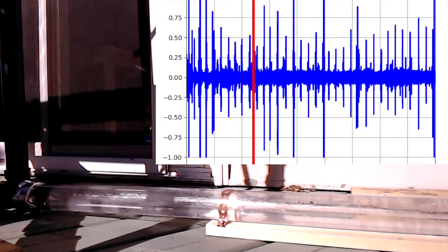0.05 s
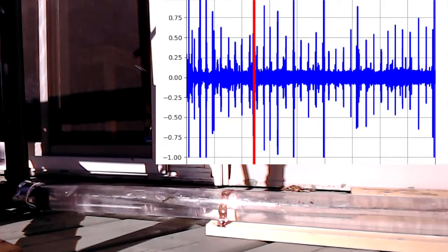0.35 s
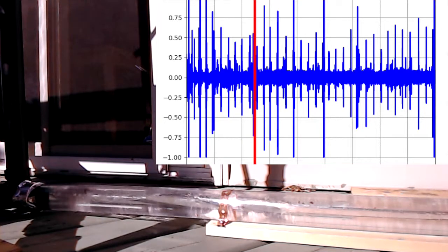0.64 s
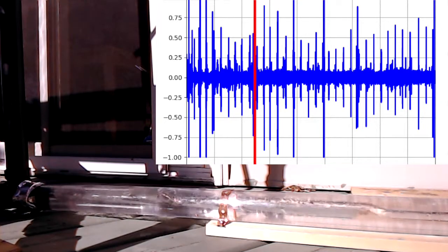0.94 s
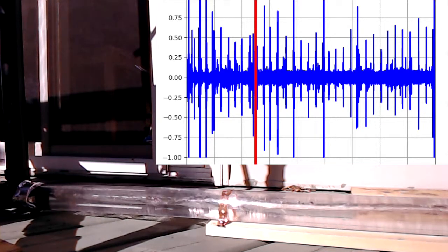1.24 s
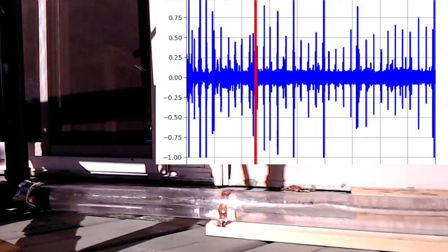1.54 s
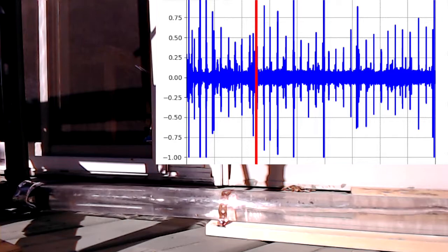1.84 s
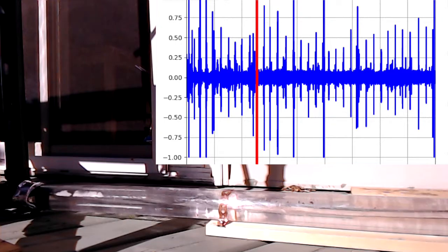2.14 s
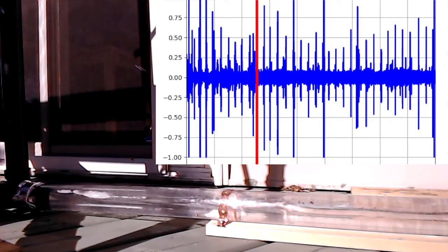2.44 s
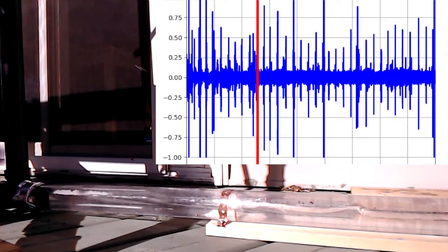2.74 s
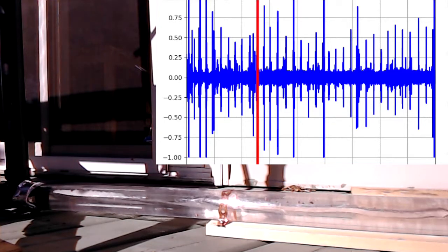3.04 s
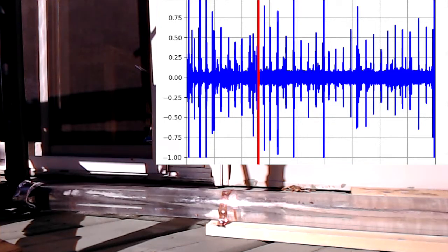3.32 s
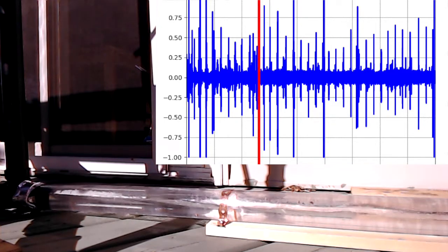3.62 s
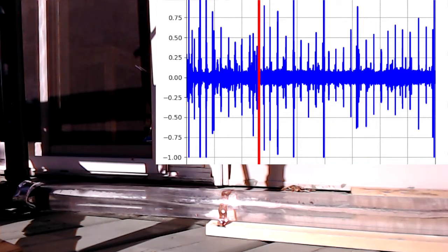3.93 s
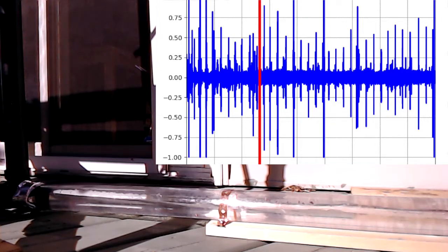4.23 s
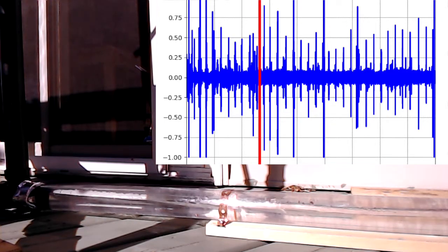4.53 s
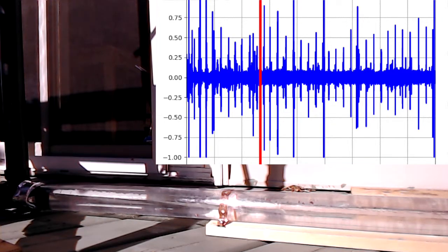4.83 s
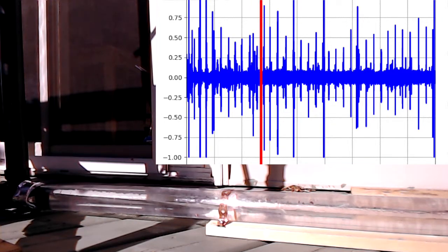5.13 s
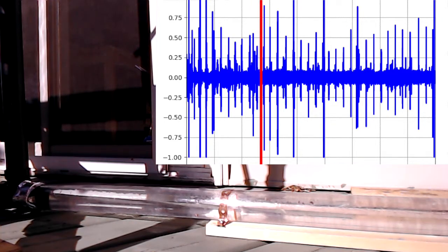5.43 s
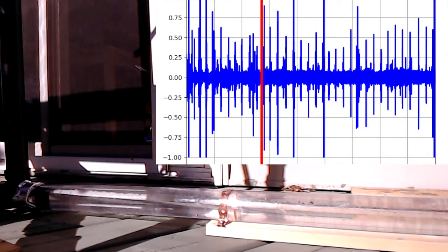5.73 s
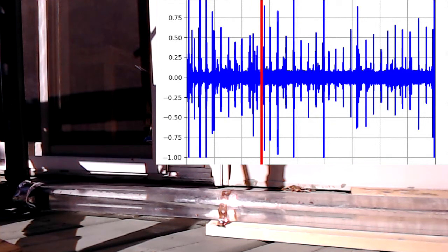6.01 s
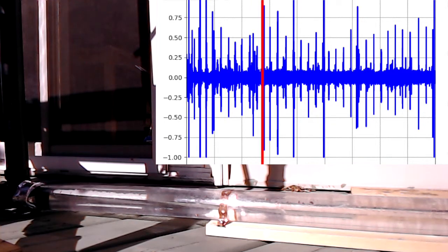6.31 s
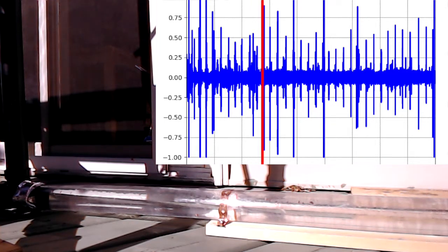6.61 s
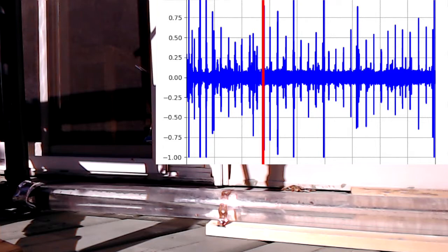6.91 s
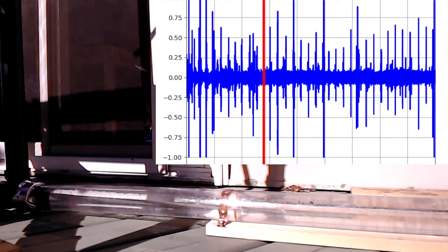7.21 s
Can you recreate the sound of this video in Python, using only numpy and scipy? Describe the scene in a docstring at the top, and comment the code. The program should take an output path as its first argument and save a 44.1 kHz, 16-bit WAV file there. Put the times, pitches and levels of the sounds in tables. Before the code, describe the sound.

Steam flows into cold water inside a plastic pipe, hissing and fizzing steadily over a low churning rumble. About two seconds in, a dull thump is followed by a sharp knock that briefly rings the pipe. Small spurts, ticks and a faint rising whistle follow. Near the end the thump and knock come again, harder, overloading the close stereo microphone.

```python
"""Water hammer in a plastic pipe, twice: a steam pocket collapses with a dull thump, and about 0.4 s
later a sharp knock rings the pipe. The steam flowing into the cold water hisses steadily, with fizz,
spurts, ticks and a faint whistle, over the low rumble of churning water.
A small narrow-band stereo microphone stands close by and overloads on the last knock."""
import sys
import numpy as np
from scipy import signal
from scipy.fft import rfft, irfft
from scipy.io import wavfile

SR = 44100
rng = np.random.default_rng(int(sys.argv[2]) if len(sys.argv) > 2 else 0)


def waveform_to_disk(signal):
    """Save audio, clipped to [-1, 1], as 16-bit WAV at the path in sys.argv[1]."""
    frames = np.transpose(np.atleast_2d(signal))
    scaled = np.clip(frames, -1, 1) * 32767
    samples = np.round(scaled).astype(np.int16)
    wavfile.write(sys.argv[1], SR, samples)


N = 328986


# cushioned steam pockets: start_s, strength_db, bounce_hz
SOFT_POCKETS = [(1.389, -22, 760), (1.7815, -1, 204), (3.967, -23.5, 525), (5.076, -21, 450),
                (5.299, -20, 666), (6.9603, 2, 240)]
# hammer slams: start_s, strength_db, bounce_hz, top_hz, first_rebound_db, heave_db
SLAMS = [(2.2057, -1.24, 710, 3070, -8, -1.5), (7.3462, -0.5, 850, 2120, 7, 4.5)]

def collapse_pressure():
    """A soft pocket thuds and rebounds faintly; a slam heaves the water back and rebounds twice."""
    pressure = np.zeros(N)
    for start_s, strength_db, bounce_hz in SOFT_POCKETS:
        thud = from_db(strength_db) * collapse(bounce_hz, quality=0.66, top_hz=2.35 * bounce_hz)
        add(pressure, thud, start_s)
        add(pressure, from_db(-15.5) * thud, start_s + 0.036)
    for start_s, strength_db, bounce_hz, top_hz, first_rebound_db, heave_db in SLAMS:
        slam = from_db(strength_db) * collapse(bounce_hz, quality=5.7, top_hz=top_hz)
        heave = from_db(heave_db) * collapse(bounce_hz=63, quality=1.65, top_hz=92)
        add(pressure, slam, start_s)
        add(pressure, heave, start_s + 0.0048)
        add(pressure, rebound(first_rebound_db), start_s + 0.006966)
        add(pressure, rebound(strength_db=-5), start_s + 0.025)
    return pressure


def collapse(bounce_hz, quality, top_hz):
    """A pocket caves in and bounces; steam left inside cushions the pulse and dulls it."""
    w = 2 * np.pi * bounce_hz
    kick = cut(signal.unit_impulse(SR // 8), bounce_hz, "high", order=1)
    resonator = signal.bilinear([-1, 0, 0], [1, w / quality, w * w], SR)
    bounce = signal.lfilter(*resonator, kick)
    return cut(bounce, top_hz, "low", order=3)


def rebound(strength_db, db_per_octave=8):
    """The pocket reopens and caves in again: a low pulse, brighter the harder it is."""
    top_hz = 710 * 2 ** (strength_db / db_per_octave)
    return from_db(strength_db) * collapse(bounce_hz=278, quality=1.1, top_hz=top_hz)


# modes of the clamped, water-filled pipe: pitch_hz, gain_db, t60_s
PIPE_MODES = [(179, -32, 0.62), (254.3, -18.5, 0.14), (334, -28.5, 0.42), (374, -17.5, 0.07),
              (389.2, -14.5, 0.072), (446.8, -18, 0.13), (505, -21, 0.13), (536.5, -18.5, 0.088),
              (650, -20, 0.086), (694, -19.5, 0.085), (792, -22, 0.083), (902.6, -24.5, 0.12),
              (950.3, -18.5, 0.11), (996, -31, 0.14), (1454, -27.5, 0.052), (1900, -32, .04),
              (2050, -33.5, 0.042)]
# reflections: delay_s, left_db, right_db
REFLECTIONS = [(0.0053, -12, -31), (0.0132, -19.5, -10.5), (0.0193, -17.5, -14), (0.0278, -14, -21)]

def pipe(pressure):
    """Pressure pulses ring the pipe's modes; the pulse bounces along the pipe and repeats the sound."""
    direct = sum(from_db(db) * stereo_gains(hz) * ring(pressure, hz, t60_s)
                 for hz, db, t60_s in PIPE_MODES)
    out = direct.copy()
    for delay_s, left_db, right_db in REFLECTIONS:
        lag = round(delay_s * SR)
        out[:, lag:] += from_db([[left_db], [right_db]]) * direct[:, :-lag]
    return out


# crowded modes of the pipe wall: freq_hz, density_db
CRACK_SPECTRUM = [(500, -33), (1200, -1), (1550, 2), (2100, 2.5), (2650, -11), (3300, 3), (4500, -9.5),
                  (7000, -10)]
# scattered tail of a knock: freq_hz, density_db
TAIL_SPECTRUM = [(60, 1.5), (180, 11), (255, 0), (380, 2), (540, -2.5), (760, -3), (980, -3.5), (1120, -8),
                 (7000, -14.5)]

def water_hammer(knock_db, crack_left_db, crack_right_db, tail_db):
    """Each collapse rings the pipe; sharp ones also draw a bright crack from its wall."""
    pressure = collapse_pressure()
    knocks = from_db(knock_db) * pipe(pressure)
    crack = scatter(pressure, CRACK_SPECTRUM, t60_s=0.051, build_s=0.0005)
    tail = scatter(knocks, TAIL_SPECTRUM, t60_s=0.19, build_s=0.0063)
    return knocks + from_db([[crack_left_db], [crack_right_db]]) * crack + from_db(tail_db) * tail


# steam flow: time_s, flow_db
STEAM_FLOW = [(0.0, -55.5), (0.48, -58), (0.75, -55), (1.24, -58), (2.37, -54), (3.45, -56.5), (3.99, -59),
              (5.17, -55), (5.74, -57), (7.27, -56.5), (7.46, -57)]
# jet hiss: freq_hz, density_db
HISS_SPECTRUM = [(700, -15.5), (1100, -0.5), (1500, 5.5), (2100, 8), (2600, -0.5), (3200, 4.5), (4200, 0.7),
                 (5300, 2.4), (6500, -8.5), (7200, -31)]

def steam_jet(hiss_db, fizz_db, sputter_db):
    """The jet hisses and fizzes, sputtering as it meets the water."""
    flow_db, = in_time(STEAM_FLOW)
    hiss = from_db(hiss_db) * banded_noise(HISS_SPECTRUM, flicker_db=2.1, flicker_hz=11)
    bubbles = from_db(fizz_db) * fizz(per_s=700, t60_cycles=15)
    return from_db(flow_db + sputter_db * drift(rate_hz=120)) * (hiss + bubbles)


def fizz(per_s, t60_cycles):
    """Tiny steam bubbles vanish, each ringing briefly and reaching the two sides unequally."""
    pitches_hz = np.geomspace(1400, 6500, 20)
    snaps = grains(per_s, spread_db=4.0)
    pitch_index = rng.integers(0, len(pitches_hz), N)
    stereo_snaps = snaps * rng.uniform(-1.07, 1, (2, N))
    return rms_one(sum(ring(stereo_snaps * (pitch_index == k), hz, t60_cycles / hz) * np.sqrt(hz)
                       for k, hz in enumerate(pitches_hz)))


# broad puffs: middle_s, level_db
STEAM_PUFFS = [(0.586, -46), (0.691, -44.5), (1.254, -44.5), (2.001, -41), (2.036, -43), (2.311, -40.5),
               (3.807, -49.5), (3.916, -47), (5.094, -46), (6.162, -41.5), (6.425, -46.5), (7.42, -43.5)]
# narrow spits: middle_s, length_s, level_db, pitch_hz
BUBBLE_SPITS = [(.022, 0.019, -42.5, 1900), (.072, .009, -41, 2980), (0.77, 0.037, -42, 2140),
                (.968, .016, -46, 3260), (5.35, 0.016, -39.5, 3300), (5.55, 0.13, -51.5, 3270),
                (5.684, .028, -46, 1970)]

def spurts(puff_gain_db, spit_gain_db, puff_length_s):
    """Steam breaks through in short swells: broad puffs, or narrow spits where a bubble rings."""
    out = np.zeros((2, N))
    for middle_s, level_db in STEAM_PUFFS:
        puff = spurt(puff_length_s, pitch_hz=4020, edge_ratio=1.38)
        add(out, from_db(level_db + puff_gain_db) * puff, middle_s - 2 * puff_length_s)
    for middle_s, length_s, level_db, pitch_hz in BUBBLE_SPITS:
        spit = spurt(length_s, pitch_hz, edge_ratio=1.067)
        add(out, from_db(level_db + spit_gain_db) * spit, middle_s - 2 * length_s)
    return out


def spurt(length_s, pitch_hz, edge_ratio):
    """A swell of hiss around one pitch, loudest two lengths after its start."""
    t = np.arange(SR // 2) / SR
    band_hz = [pitch_hz / edge_ratio, pitch_hz * edge_ratio]
    hiss = rms_one(cut(rng.standard_normal((2, len(t))), band_hz, "band"))
    return swell(t, 2 * length_s, length_s) * hiss


# deep sloshing: freq_hz, density_db
SLOSH_SPECTRUM = [(20, -2), (45, 3.5), (70, 2.5), (97, 2), (140, -4.5), (200, -14.5)]
# tumbling water: freq_hz, density_db
RUMBLE_SPECTRUM = [(110, -12.5), (150, 3.5), (205, -5), (255, -1), (360, -0.5), (480, -4), (700, -11.5),
                   (950, -8.5), (1250, -17), (2000, -37.5)]

def churning(slosh_db, rumble_db, patter_db, patter_top_hz):
    """Stirred by the flow, water sloshes and tumbles while small collapses patter on the wall."""
    flow_db, = in_time(STEAM_FLOW)
    swing_db = flow_db - flow_db.mean()
    slosh = from_db(slosh_db) * banded_noise(SLOSH_SPECTRUM, flicker_db=0.5, flicker_hz=9)
    small_collapses = cut(grains(per_s=130, spread_db=6.0), patter_top_hz, "low")
    patter = from_db(patter_db) * rms_one(pipe(small_collapses))
    rumble = from_db(rumble_db) * banded_noise(RUMBLE_SPECTRUM, flicker_db=2.0, flicker_hz=14.4)
    return from_db(0.12 * swing_db) * (slosh + rumble) + from_db(0.6 * swing_db) * patter


# water column surges: middle_s, length_s, level_db
COLUMN_SURGES = [(.17, 0.2, -37.5), (2.117, 0.51, -39), (3.637, 0.87, -43), (5.25, .13, -42)]

def surges(top_hz):
    """The water column surges to and fro: slow swells of the deepest slosh."""
    t = np.arange(N) / SR
    envelope = sum(from_db(db) * swell(t, middle_s, length_s) for middle_s, length_s, db in COLUMN_SURGES)
    slosh = banded_noise(SLOSH_SPECTRUM, flicker_db=-0.5, flicker_hz=10)
    return envelope * rms_one(cut(slosh, top_hz, "low", order=4))


# bubble snaps: start_s, peak_db, pitch_hz
BUBBLE_TICKS = [(0.55, -34, 4700), (1.73, -33.5, 5000), (2.1895, -31, 4000), (2.8928, -23, 5500),
                (6.825, -30, 4520)]

def ticks(t60_s):
    """Single bubbles snap near the wall."""
    out = np.zeros(N)
    for start_s, peak_db, pitch_hz in BUBBLE_TICKS:
        add(out, from_db(peak_db) * ring(signal.unit_impulse(SR // 20), pitch_hz, t60_s), start_s)
    return out


# whistle glide: time_s, pitch_hz, level_db
WHISTLE_GLIDE = [(3.42, 2160, -72), (3.48, 2350, -46), (3.53, 2560, -50), (3.57, 2730, -59),
                 (3.62, 2800, -40), (3.66, 2970, -44), (3.7, 3120, -56)]

def whistle(gain_db, half_width_hz):
    """A narrow, airy band of noise that glides upward."""
    pitch_hz, level_db = in_time(WHISTLE_GLIDE)
    wobble = rms_one(cut(rng.standard_normal((2, N)), half_width_hz, "low"))
    carrier = np.exp(2j * np.pi * np.cumsum(pitch_hz) / SR)
    return from_db(level_db + gain_db) * np.real((wobble[0] + 1j * wobble[1]) * carrier)


def scatter(x, spectrum, t60_s, build_s):
    """A short diffuse ring, partly different on each side."""
    t = np.arange(SR // 2) / SR
    noise = rng.standard_normal((2, len(t))) + 0.54 * rng.standard_normal(len(t))
    freq_hz = np.maximum(np.fft.rfftfreq(len(t), 1 / SR), 1)
    coloured = irfft(rfft(noise) * from_db(at_hz(spectrum, freq_hz)), len(t))
    envelope = from_db(-60 * t / t60_s) * (1 - np.exp(-t / build_s))
    response = coloured * envelope / np.sqrt(SR * t60_s / 10)
    return signal.fftconvolve(np.atleast_2d(x), response, axes=1)[:, :N]


# likeness of left and right: freq_hz, correlation
STEREO_CORRELATION = [(60, 0.32), (120, 0.44), (230, 0.25), (450, 0.9), (870, 0.72), (1300, 0.06),
                      (1900, -0.61), (3300, -0.5), (4600, 0.4), (6500, 0)]

def banded_noise(spectrum, flicker_db, flicker_hz):
    """Third-octave bands of stereo noise, each with its own flicker and correlation; rms 1."""
    edges_hz = 16 * 2 ** (np.arange(29) / 3)
    white = rng.standard_normal((2, 2, N))
    out = np.zeros((2, N))
    for k, (low_hz, high_hz) in enumerate(zip(edges_hz, edges_hz[1:])):
        if high_hz > spectrum[0][0] and low_hz < spectrum[-1][0]:
            centre_hz = np.sqrt(low_hz * high_hz)
            correlation = at_hz(STEREO_CORRELATION, centre_hz)
            mid_side = np.sqrt([1 + correlation, 1 - correlation])
            to_left_right = stereo_gains(centre_hz) * mid_side * [[1, 0.95], [1, -1.075]]
            gain = from_db(at_hz(spectrum, centre_hz) + flicker_db * drift(flicker_hz))
            out += gain * (to_left_right @ cut(white[k % 2], [low_hz, high_hz], "band"))
    return rms_one(out)


# stereo balance: freq_hz, left_minus_right_db
STEREO_BALANCE = [(60, -3), (200, -7), (500, -4), (1000, -4), (2300, -0.6), (6500, -.5)]

def stereo_gains(hz):
    """Left and right gains: low sounds favour the right."""
    return from_db(at_hz(STEREO_BALANCE, hz) * np.array([[0.5], [-0.5]]))


def grains(per_s, spread_db):
    """Random clicks: many small, a few large."""
    sizes = from_db(spread_db * np.minimum(rng.exponential(1, N), 4))
    signs = rng.choice([-1, 1], N)
    return sizes * signs * (rng.random(N) < per_s / SR)


def drift(rate_hz):
    """Smooth random wander, rms 1."""
    hop, warmup = 40, 2000
    r = np.exp(-2 * np.pi * rate_hz * hop / SR)
    noise = rng.standard_normal(N // hop + warmup + 2)
    slow = signal.lfilter([1], [1, -2 * r, r * r], noise)[warmup:]
    return np.interp(np.arange(N) / hop, np.arange(len(slow)), rms_one(slow))


def ring(clicks, hz, t60_s):
    """A unit click starts a decaying sine of height 1."""
    r = from_db(-60 / (t60_s * SR))
    w = 2 * np.pi * hz / SR
    return signal.lfilter([0, np.sin(w)], [1, -2 * r * np.cos(w), r * r], clicks + 1e-18)


def swell(t, middle_s, length_s):
    """A bell curve of height 1."""
    return np.exp(-2 * ((t - middle_s) / length_s) ** 2)


def cut(x, hz, kind, order=2):
    """Butterworth filter."""
    return signal.sosfilt(signal.butter(order, hz, kind, fs=SR, output="sos"), x + 1e-18)


def add(track, sound, start_s):
    """Mix a short sound into a track."""
    start = int(np.clip(round(start_s * SR), 0, N - 1))
    track[..., start:start + sound.shape[-1]] += sound[..., :N - start]


def in_time(rows):
    """Each column of a curve at every sample."""
    time_s, *columns = np.transpose(rows)
    return [np.interp(np.arange(N) / SR, time_s, column) for column in columns]


def at_hz(points, hz):
    """Read a curve on a log-frequency axis."""
    freq_hz, values = np.transpose(points)
    return np.interp(np.log(hz), np.log(freq_hz), values)


def from_db(db):
    """Decibels to gain."""
    return 10 ** (np.asarray(db) / 20)


def rms_one(x):
    """Scale to rms 1."""
    return x / np.sqrt(np.mean(x ** 2) + 1e-20)


def scene():
    """Knocks over churning water and hissing steam."""
    hammer = water_hammer(knock_db=1.0, crack_left_db=12.5, crack_right_db=16.0, tail_db=-4.5)
    water = churning(slosh_db=-39, rumble_db=-40, patter_db=-53, patter_top_hz=1500) + surges(top_hz=68)
    steam = steam_jet(hiss_db=8.0, fizz_db=-2.0, sputter_db=1.68)
    steam += spurts(puff_gain_db=-0.5, spit_gain_db=-4.0, puff_length_s=0.019)
    return hammer + steam + water + ticks(t60_s=0.003) + whistle(gain_db=-10.5, half_width_hz=130)


def record(dry):
    """The microphone rolls off near 7 kHz; the loudest knock then clips and splashes higher."""
    rolled_off = cut(dry, 6930, "low", order=12)
    band_limit = signal.ellip(10, 0.2, 80, 7150, fs=SR, output="sos")
    clipped = np.clip(signal.sosfilt(band_limit, rolled_off), -1, 1)
    return cut(clipped, 16000, "low", order=10)


dry = scene()
out = record(dry)
waveform_to_disk(out)
```